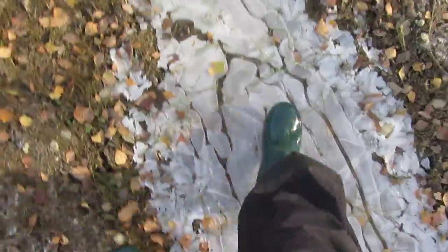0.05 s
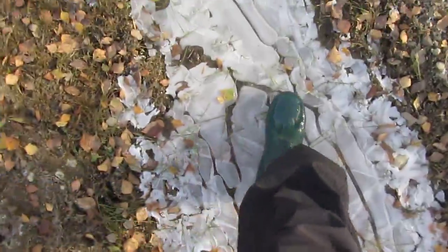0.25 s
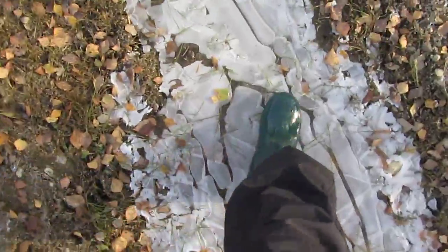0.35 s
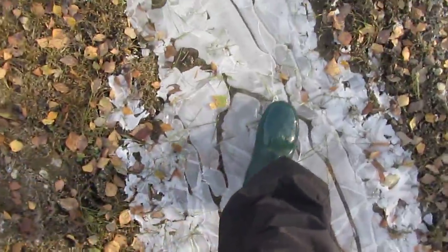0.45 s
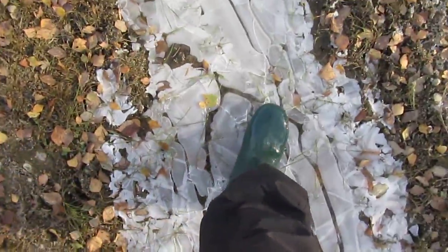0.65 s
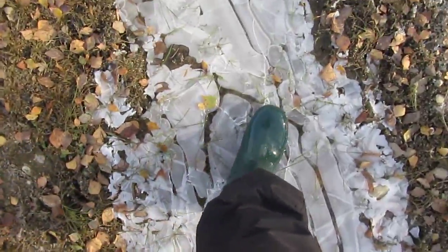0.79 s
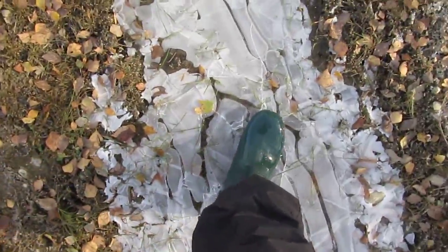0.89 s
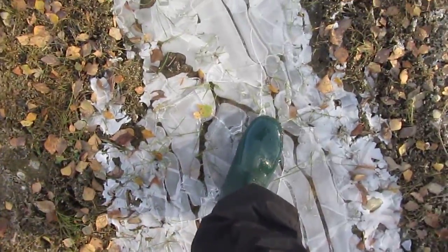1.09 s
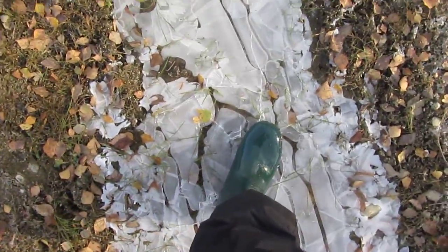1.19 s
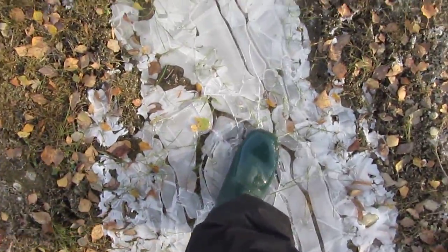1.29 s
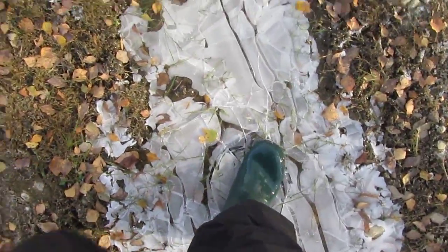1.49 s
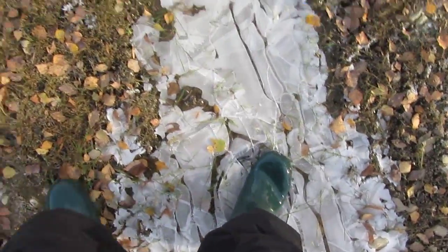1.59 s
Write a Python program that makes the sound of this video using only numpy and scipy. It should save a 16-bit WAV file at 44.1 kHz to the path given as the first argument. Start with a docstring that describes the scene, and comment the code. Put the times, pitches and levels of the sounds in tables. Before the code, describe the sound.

Thin ice crunches and cracks under one step of a rubber boot. Dull hollow knocks lead into a loud snap and crackling, then two more sharp breaks and small ticks of settling shards, heard outdoors from chest height.

```python
"""Outdoors on a thin, hollow sheet of ice: one step of a rubber boot, heard from chest height.
Each shift of weight crushes the ice into a crunch of tiny fractures. The ice snaps, the heel knocks
the sheet into its low modes and the sole slides with a faint hiss. A second pair of sharp breaks
follows, then loose shards tick and settle. Faint air rumble lies under it all."""
import sys
import numpy as np
from scipy import signal
from scipy.fft import rfft, irfft
from scipy.io import wavfile

SR = 44100
rng = np.random.default_rng(int(sys.argv[2]) if len(sys.argv) > 2 else 0)


def wav_record(signal):
    """Record a signal, one row per channel, as 16-bit PCM in the file named by sys.argv[1]."""
    frames = np.transpose(np.atleast_2d(signal))
    bounded = np.clip(frames, -1, 1)
    # unit amplitude maps onto the largest positive 16-bit level
    quanta = np.round(bounded * 32767).astype(np.int16)
    wavfile.write(sys.argv[1], SR, quanta)


N = 72765


def undb(db):
    """Decibels to gain."""
    return 10 ** (np.asarray(db) / 20)


def unit(x):
    """Scale each channel to unit energy."""
    return x / np.sqrt(np.sum(x ** 2, axis=-1, keepdims=True) + 1e-18)


def curve(points, hz):
    """Read (Hz, dB) points on a log-frequency axis."""
    point_hz, point_db = np.array(points, float).T
    return np.interp(np.log(hz + 1), np.log(point_hz), point_db)


def colour(x, points, tilt_db_oct=0, size=2048):
    """Minimum-phase filter of unit energy: the given spectrum, tilted above 2 kHz."""
    hz = np.fft.rfftfreq(size, 1 / SR)
    gain_db = curve(points, hz) + tilt_db_oct * np.log2(np.maximum(hz, 2000) / 2000)
    cepstrum = irfft(np.log(undb(gain_db)))
    cepstrum[1:size // 2] *= 2
    cepstrum[size // 2 + 1:] = 0
    response = unit(irfft(np.exp(rfft(cepstrum))))
    return signal.fftconvolve(x, response[None], axes=-1)[:, :x.shape[-1]]


def add(out, x, start_s):
    """Mix x into out from start_s."""
    i = int(np.clip(start_s * SR, 0, N - 1))
    out[..., i:i + x.shape[-1]] += x[..., :N - i]


# Outdoor air. Each row: frequency in Hz, relative level in dB.
AIR_SPECTRUM = [(20, -2), (50, -1.5), (75, -7), (105, -5.5), (200, -11.5), (700, -7.5), (2000, -11.5),
                (8000, -27), (16000, -50)]

def air(level_db=-53.5, step_s=0.085):
    """Faint outdoor rumble and hiss that wander in level."""
    steps_s = np.arange(40) * step_s
    wander_db = 0.5 * np.interp(np.arange(N) / SR, steps_s, rng.uniform(-1.4, 1, len(steps_s)))
    return undb(level_db + wander_db) * colour(rng.standard_normal((2, N)), AIR_SPECTRUM)


def fractures(samples, rate_per_s, fragments, spread_db=1.5, decay_s=0.00022, size=192):
    """Tiny breaks of uneven size, shared among a few fragments, each with its own tick."""
    ticks = unit(rng.standard_normal((fragments, 2, size)) * np.exp(-np.arange(size) / SR / decay_s))
    chance, strength, sign, owner = rng.random((4, samples))
    gain = undb(-spread_db * np.log(strength + 0.0051)) * np.sign(sign - 0.5)
    out = np.zeros((2, samples + size))
    for i in np.flatnonzero(chance < rate_per_s / SR):
        out[:, i:i + size] += gain[i] * ticks[int(owner[i] * fragments)]
    return out[:, :samples]


# Resonances under the ice. Each row: frequency in Hz, level in dB, decay in seconds.
HOLLOW_RESONANCES = [(267, -56.5, 0.023), (400, -47.5, 0.016), (777, -41.5, 0.0064), (1005, -40, 0.014)]

def hollow(x, size=4096):
    """The direct sound plus the ring it excites in the hollow."""
    t = np.arange(size) / SR
    ring = sum(undb(db) * np.exp(-t / decay_s) * np.cos(2 * np.pi * hz * t)
               for hz, db, decay_s in HOLLOW_RESONANCES)
    ring[0] += 1
    return signal.fftconvolve(x, ring[None], axes=-1)[:, :x.shape[-1]]


# Crushed ice and the sheet under it. Each row: frequency in Hz, relative level in dB.
GRIT_SPECTRUM = [(300, -56.5), (800, 5), (1200, 0), (1900, 3.5), (2800, 1.5), (4000, 2), (5500, -0.5),
                 (6800, 1.5), (7900, -3.5), (9500, -1.5), (12500, -9.5), (16000, -26.5)]
BODY_SPECTRUM = [(40, -30), (90, -33), (150, -5.5), (250, 1.5), (420, -0.5), (560, 1.5), (780, -2.5),
                 (1050, -7), (1600, -21.5), (4000, -29.5)]
# Shifts of weight. Each row: start, attack, length and release in seconds, grit and body levels in dB,
# swell in dB per second, grit tilt in dB per octave.
WEIGHT_SHIFTS = [(.0, 0.0094, 0.13, 0.027, -54, -56, -29, -2),
                 (0.173, 0.0037, 0.43, 0.012, -46.5, -54, 11.5, -3),
                 (0.246, 0.025, 0.039, 0.012, -38.5, -44, -17, -1),
                 (0.4, 0.0021, 0.018, 0.021, -28, -32, 0, -1),
                 (0.427, 0.028, 0.044, 0.0088, -25, -29, 18, .5),
                 (0.476, 0.013, 0.059, 0.073, -28, -33.5, -57, 0),
                 (0.556, 0.026, .15, 0.064, -32.5, -38.5, -4.5, -1),
                 (0.702, .04, 0.066, 0.044, -44.5, -49.5, 2, 1.5),
                 (0.825, 0.028, .13, .03, -33.5, -36, -13, 1),
                 (1.083, 0.022, 0.17, .02, -54.5, -54, 21, -0.5),
                 (1.217, 0.014, 0.079, 0.0013, -31.5, -34, 39, 0.5),
                 (1.262, 0.0036, 0.11, 0.037, -45, -50.5, 11, 0),
                 (1.405, 0.0071, 0.23, .02, -51, -60, 9, -2),
                 (1.538, 0.045, 0.13, .02, -59.5, -49.5, -5, -8)]

def crunch(size=24000):
    """Each push sets off a stream of fractures, denser when harder: bright grit over a dull body."""
    out, t = np.zeros((2, N)), np.arange(size) / SR
    for start_s, attack_s, length_s, release_s, grit_db, body_db, swell_db_s, tilt in WEIGHT_SHIFTS:
        load = np.minimum(t / attack_s, 1) * undb(swell_db_s * np.minimum(t, length_s))
        load *= np.exp(-np.maximum(t - length_s, 0) / release_s)
        rate_per_s = 3800 * 10 ** ((grit_db + 30.5) / 39)  # tenfold per 39 dB
        grit = colour(fractures(size, rate_per_s, fragments=8), GRIT_SPECTRUM, tilt)
        body = colour(hollow(fractures(size, rate_per_s, fragments=4)), BODY_SPECTRUM)
        crush = undb(grit_db) * unit(grit) + undb(body_db) * unit(body)
        add(out, load * np.sqrt(size) * crush, start_s)
    return out


HIT_GAIN = np.sqrt(0.005 * SR)  # unit energy to unit RMS over 5 ms
# Snapping ice and the jolted sheet. Each row: frequency in Hz, relative level in dB.
SNAP_SPECTRUM = [(300, -27.5), (900, -1), (1400, 1), (1850, 1.5), (2300, 2), (2700, 1.5), (3800, 1.5),
                 (5500, 1.5), (6900, 0.5), (10000, -3), (13000, -10.5), (16000, -24)]
JOLT_SPECTRUM = [(40, -12.5), (90, -15), (150, -5.5), (280, -2), (420, 0), (570, 2), (760, -2), (1000, -15),
                 (1600, -23), (4000, -43)]
# Sharp breaks. Each row: start in seconds, snap and jolt levels in dB, snap tilt in dB per octave,
# decay in seconds, pan (positive is left), shard pitch in Hz.
ICE_BREAKS = [(0.0422, -52, -55, 8, 0.00088, 5, 5580), (0.1223, -50, -50, -8, 0.00067, -11, 1990),
              (0.1744, -42.5, -38.5, -0.5, 0.0034, 3, 2900), (0.1806, -34, -52, -5.5, 0.00042, 0, 3160),
              (0.2011, -32.5, -26, -8, 0.00092, 1, 2580), (0.2249, -35.5, -26.5, -12, 0.00073, -7, 3040),
              (0.2401, -43, -52, 0, 0.00084, 0, 7000), (0.2702, -30, -44.5, -6, 0.00027, -15, 2400),
              (.2770, -27.5, -45, -5, 0.0021, -6, 2940), (0.2864, -34.5, -36.5, -10, 0.0027, 0, 2700),
              (.3350, -31, -44.5, -2.5, 0.00081, 1.5, 6700), (0.4032, -10.5, -16, 0.5, 0.0012, 0, 2370),
              (.4110, -18, -26.5, 1.5, 0.00099, 12, 7040), (0.4312, -22, -49, -1, .001, -6, 6340),
              (0.4376, -19, -27.5, 1, 0.0011, 2.5, 6940), (0.4465, -26, -33, 2, 0.00098, 0, 3800),
              (0.4525, -26, -28, 0, 0.00078, -6, 4800), (0.4672, -23, -53, -2, 0.0005, .5, 6700),
              (.4940, -22, -26, -2, 0.00029, 3, 7000), (0.5363, -31, -26.5, 1, 0.0034, 2, 8950),
              (0.6169, -26.5, -33.5, 0, 0.00089, 3, 4030), (.6763, -23.5, -27.5, -1, 0.00097, 2, 6700),
              (0.6984, -36, -53, 3, 0.00068, 0, 6500), (.7289, -35.5, -60, 12, 0.00052, -3, 8300),
              (0.8318, -39.5, -44, -4, 0.00052, 2, 5030), (0.9127, -26.5, -35.5, -1, 0.0028, .5, 6950),
              (.9205, -29, -37, 7, 0.00066, -1, 4800), (0.9881, -37, -37, 2, 0.0005, 2, 4700),
              (1.015, -37.5, -40, -4.5, 0.0022, 0, 5200), (1.0479, -42, -45.5, 4.5, 0.0011, -1, 5270),
              (1.075, -43.5, -55, 5.5, 0.0011, 1, 5400), (1.0969, -36, -41, -5.5, 0.002, 1, 1050),
              (1.110, -48, -50, -5, 0.00083, 0, 1500), (1.1212, -39.5, -41, -0.5, 0.00044, 0, 2450),
              (1.2259, -41, -34, 2, 0.002, -1, 4500), (1.2562, -16, -27.5, 1.5, 0.001, 0, 2570),
              (1.2767, -23.5, -33, 12, 0.00081, 3, 6760), (1.2822, -13, -21, 1, 0.00089, -0.5, 1900),
              (1.3502, -40.5, -55, -1, 0.0012, 6, 6000), (1.3654, -29.5, -32, -1.5, 0.00023, 0, 1980),
              (1.3671, -26.5, -34.5, 1, 0.0019, -1, 1820), (1.4478, -41.5, -73, 2, 0.00083, 0, 3000),
              (1.462, -44.5, -50, 4, 0.0018, 2, 3970), (1.5535, -33.5, -66, -0.5, 0.00036, -0.5, 7000),
              (1.6406, -41, -63, 3, 0.00046, 1, 7150)]

def cracks(rise_s=0.00029, jagged_db=3, shard_db=5.5, shard_decay_cycles=2.4, size=4096):
    """A break runs in uneven steps, sheds splinters, rings the freed shard and jolts the sheet."""
    out, t = np.zeros((2, N)), np.arange(size) / SR
    splinters = undb(-18.5) * np.exp(-t / 0.0052)
    shudder = undb(-13) * np.exp(-t / 0.0053)
    for start_s, snap_db, jolt_db, tilt_db_oct, decay_s, pan, shard_hz in ICE_BREAKS:
        snap_noise, jolt_noise, steps = rng.standard_normal((3, 2, size))
        envelope = np.exp(-t / decay_s) * (1 - np.exp(-t / rise_s))
        burst = snap_noise * undb(jagged_db * steps[0]) * (envelope + splinters)
        shard = signal.lfilter(*signal.iirpeak(shard_hz, np.pi * shard_decay_cycles, fs=SR), burst)
        snap = colour(burst + undb(shard_db) * shard, SNAP_SPECTRUM, tilt_db_oct)
        jolt = colour(jolt_noise * (envelope + shudder), JOLT_SPECTRUM)
        hit = undb(snap_db) * unit(snap) + undb(jolt_db) * unit(jolt)
        hit[1] += hit[0] * np.tanh(pan / 8)  # mid into side
        add(out, HIT_GAIN * hit, start_s)
    return out


# Modes of the sheet. Each row: multiple of the pitch, level in dB, decay in seconds.
THUD_MODES = [(.62, -3.5, 0.0092), (1.0, 8, 0.0033), (1.22, -8, 0.0031), (2.25, -9, 0.0034),
              (3.05, -13, 0.0025), (3.42, -23.5, 0.0066)]
# Knocks on the sheet. Each row: start in seconds, level in dB, pitch in Hz, hardness in dB per octave.
BOOT_KNOCKS = [(.1750, -36.5, 248, -4), (.2030, -16.5, 221.3, 0.5), (0.2241, -20, 260, 4.5),
               (0.289, -31.5, 277, 5), (.4030, -16, 262, 6), (1.2829, -21.5, 175, 5.5),
               (1.3690, -26, 234, 10)]

def knocks(attack_s=0.0019, low_cut_hz=135, size=6000):
    """The boot drives the sheet down and its damped modes thud; a high-pass trims the deepest bass."""
    out, t = np.zeros((2, N)), np.arange(size) / SR
    low_cut = signal.butter(3, low_cut_hz, "high", fs=SR, output="sos")
    for start_s, level_db, hz, hardness_db_oct in BOOT_KNOCKS:
        thud = np.zeros(size)
        for ratio, mode_db, decay_s in THUD_MODES:
            gain = undb(mode_db + hardness_db_oct * np.log2(ratio))
            thud += gain * np.exp(-t / decay_s) * np.sin(2 * np.pi * hz * ratio * t)
        thud = signal.sosfilt(low_cut, thud * (1 - np.exp(-t / attack_s)))
        add(out[0], -undb(level_db) * HIT_GAIN * unit(thud), start_s)
    return out


def sole_rub(level_db=-59, start_s=0.25, rise_s=0.05):
    """Once down, the sole keeps sliding on the ice with a faint hiss."""
    contact = np.clip((np.arange(N) / SR - start_s) / rise_s, 0, 1)
    hiss = colour(hollow(rng.standard_normal((2, N))), GRIT_SPECTRUM, tilt_db_oct=-2.2)
    return undb(level_db) * contact * hiss


# Stereo width. Each row: frequency in Hz, side gain in dB.
SIDE_GAIN = [(30, -28), (70, -2), (130, -21), (350, -22), (700, -22), (1400, -14), (2800, -9.5), (5600, -6),
             (10000, -3.5), (15000, -0.5)]
# Stereo balance. Each row: frequency in Hz, left minus right in dB.
BALANCE = [(100, -0.5), (700, -1.4), (1500, 0), (2800, -3), (5600, .9), (10000, 1), (15000, 1.5)]

def scene(scatter_db=-25.5, scatter_decay_s=0.075, size=12000):
    """Ice and air as mid and side, spread to left and right with slight scatter from the ground."""
    hz, t = np.fft.rfftfreq(2 * N, 1 / SR), np.arange(size) / SR
    mid, side = rfft(cracks() + knocks() + crunch() + sole_rub() + air(), 2 * N)
    scatter = rng.standard_normal((2, size)) * np.exp(-t / scatter_decay_s) * (t > 0.006)
    ground = undb(scatter_db) * rfft(unit(scatter), 2 * N)
    polarity, width = np.array([[1], [-1]]), undb(curve(SIDE_GAIN, hz))
    stereo = mid * (1 + ground[0]) + polarity * width * (side + mid * ground[1])
    return irfft(stereo * undb(polarity * curve(BALANCE, hz) / 2))[:, :N]


def record(dry, top_hz=16000):
    """The loudest break overloads and clips; a low-pass cuts the top."""
    lowpass = signal.ellip(8, 0.2, 70, top_hz, fs=SR, output="sos")
    return signal.sosfilt(lowpass, np.clip(dry, -1, 1))


dry = scene()
out = record(dry)
wav_record(out)
```